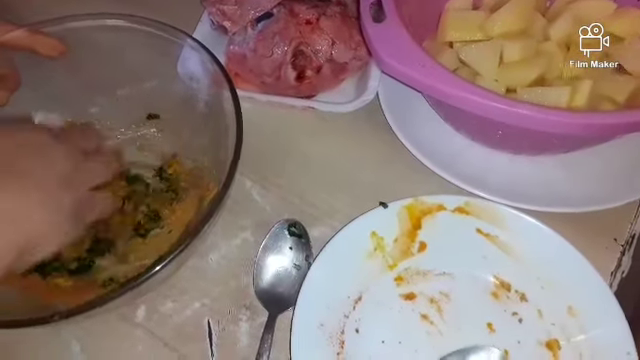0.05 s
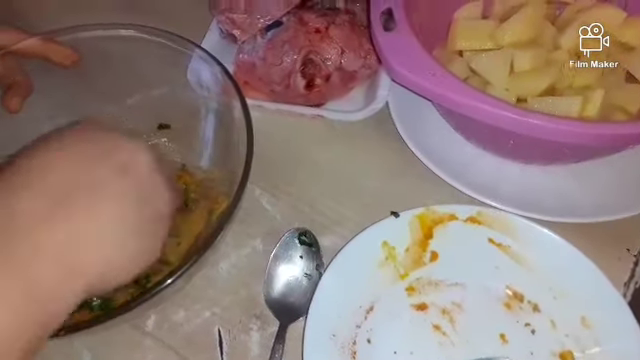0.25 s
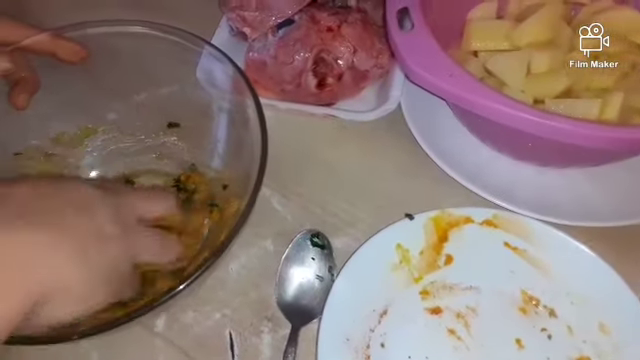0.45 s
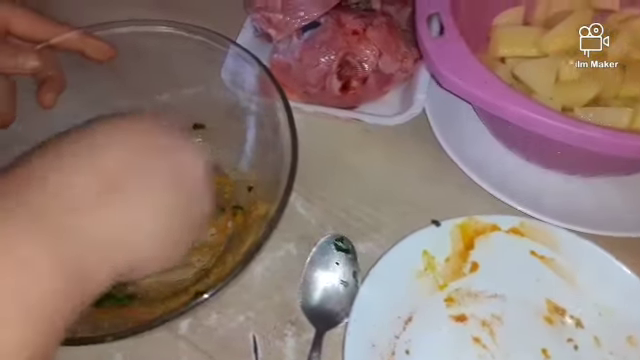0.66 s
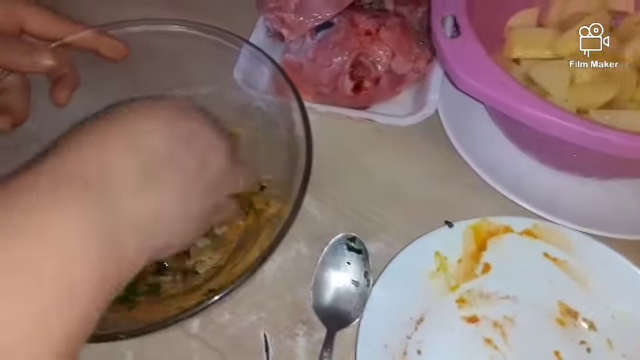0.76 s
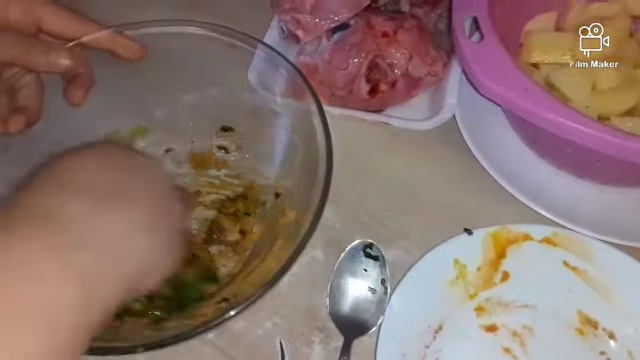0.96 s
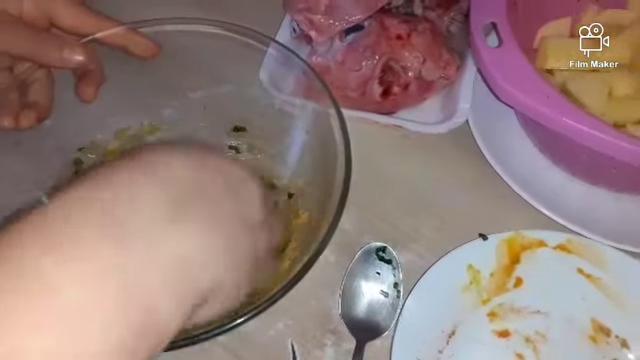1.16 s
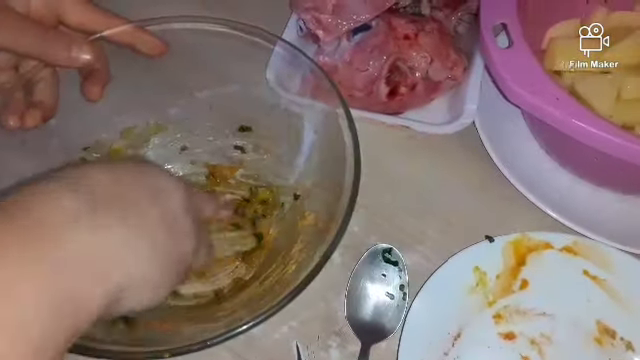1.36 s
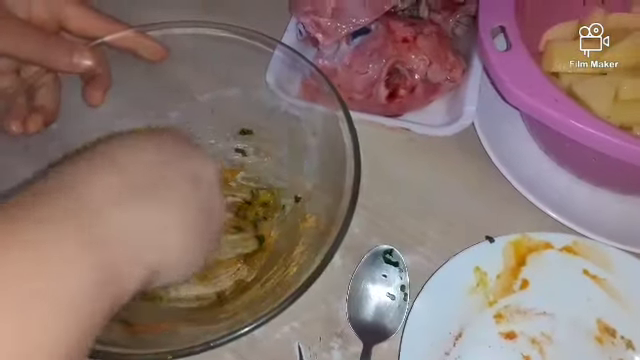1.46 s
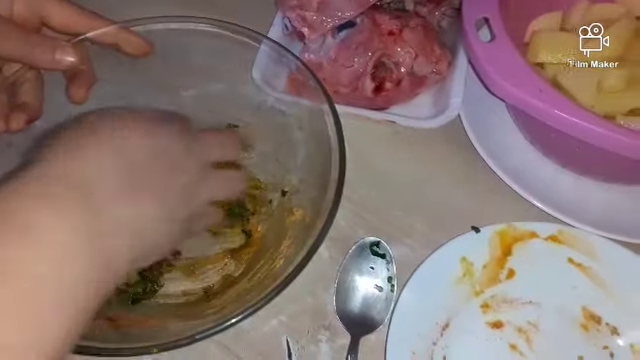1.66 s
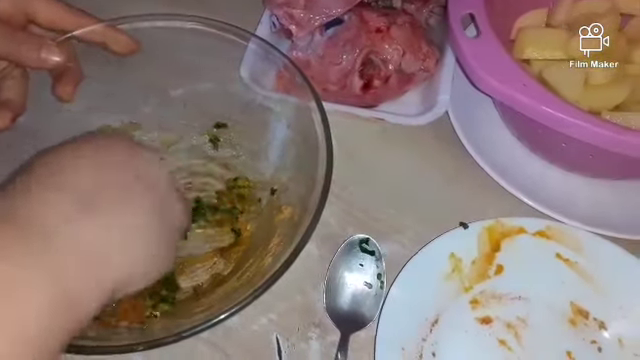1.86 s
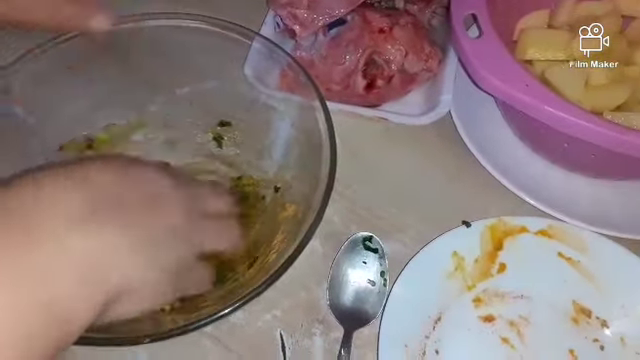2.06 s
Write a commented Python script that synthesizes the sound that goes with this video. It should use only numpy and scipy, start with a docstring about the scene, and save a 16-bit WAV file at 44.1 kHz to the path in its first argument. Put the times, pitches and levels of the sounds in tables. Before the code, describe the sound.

Hand mixing of sticky paste in a glass bowl: faint tableware ringing fades first, dull table thuds come throughout, strongest early and midway, then small wet pops gather toward the end; close, small reverberant kitchen.

```python
"""A kitchen table in a small room: two microphones hear a hand stir a wet paste in a glass bowl.
At first brushed tableware rings faintly and dies away; each hard stroke rocks the bowl, which thuds on the
table (filtered pushes), hardest near 0.2 s and 1.0 s. Paste crackles throughout (ringing clicks over noise);
from 0.27 s to the end air pockets pop (decaying sines) and the paste smacks off the glass (runs of clicks).
Behind it all lie the reverberation of bowl and room, hiss (coloured noise) and an appliance drone (a sine)."""
import sys
import numpy as np
from scipy import signal
from scipy.fft import rfft, irfft
from scipy.io import wavfile

SR = 44100
rng = np.random.default_rng(int(sys.argv[2]) if len(sys.argv) > 2 else 0)


def dump_mix(stems):
    """Bounce the given channels to the path in sys.argv[1] as a 16-bit WAV at rate SR."""
    frames = np.atleast_2d(stems).T  # one column per channel
    limited = np.clip(frames, -1, 1)  # hard clip at full scale
    pcm = np.round(limited * 32767).astype(np.int16)
    wavfile.write(sys.argv[1], SR, pcm)


N = 92610  # samples, 2.1 s

# The bowl bumps the table: (time [s], relative level [dB], softness: five times the push's rise time [s])
BOWL_KNOCKS = [(.005, -25, 0.0047), (0.1305, -12.5, 0.0039), (0.1998, -1.1, 0.0012), (0.4221, -21, 0.0029),
               (0.4529, -13, 0.0052), (.545, -29.5, 0.0037), (0.767, -12.5, .0044), (0.9507, -19, 0.0059),
               (1.014, -2.65, 0.0011), (1.24, -18.5, .0057), (1.327, -8, 0.0014), (1.702, -22, 0.0068),
               (1.899, -15.5, 0.0054)]
# Table top with the bowl on it:
# (frequency [Hz], level [dB], T60 [s], build-up time constant [s], lag at the right microphone [rad])
TABLE_TOP_MODES = [(100.7, -30, .57, .0016, 0), (116.9, -22.5, .236, .0035, 0),
                   (177, -35.5, .32, .0086, .3), (216.3, -30, .265, .0003, .18),
                   (257.3, -26.4, .089, .0024, 0), (306, -18.3, .3, .018, .1), (353, -28.6, .28, .0077, .6),
                   (396.2, -32.5, .2, .0017, 1), (432, -27.5, .146, .0022, .6),
                   (497.5, -34.5, .123, .0019, .9), (557, -33, .28, .003, .63), (785, -29, .12, .001, 1.5),
                   (1170, -33, .13, .0005, 1)]
# The slap returns from near surfaces: (delay [s], level [dB], lag at the right microphone [s])
SLAP_ECHOES = [(.01006, -3.2, .0006), (.01476, -4.4, 0), (.03324, -7, 0), (.06005, -4.5, .00018)]
# How hard the fingers work the paste: (time [s], relative level [dB])
STIRRING_EFFORT = [(0, -52), (.12, -54), (0.288, -53.5), (0.358, -63), (0.428, -60), (0.502, -59),
                   (.6, -55), (0.688, -52.5), (0.753, -67.5), (0.797, -74), (0.831, -56.5), (.9, -61.5),
                   (0.963, -51.5), (1.078, -56.5), (1.15, -54), (1.298, -65.5), (1.325, -53.5), (1.40, -53),
                   (1.46, -49), (1.549, -54), (1.62, -70.5), (1.72, -61), (1.79, -57.5), (1.828, -53),
                   (1.89, -53), (1.94, -50), (2.0, -62), (2.1, -60)]
# Tone colour of the paste: (frequency [Hz], relative level [dB])
PASTE_SPECTRUM = [(300, -3.5), (600, -5.5), (780, -4), (950, -0.5), (1250, 3), (1900, -6.5), (2700, -0.5),
                  (4300, -3.5), (6700, -3), (8200, -8.5), (9900, -21.5), (12500, -10.5), (15800, -20)]
# Air pockets burst: (time [s], relative level [dB], frequency [Hz], length of ring to -60 dB [cycles])
POCKET_BURSTS = [(.2665, -30, 5400, 12), (0.596, -31, 4450, 7.4), (0.689, -31.5, 7300, 1.3),
                 (0.8324, -42, 6170, 7), (0.945, -31, 4430, 4), (0.953, -28.5, 3900, 11),
                 (1.136, -27, 6660, 0.98), (1.1624, -45, 5590, 9.9), (1.311, -35, 5700, 15),
                 (1.4511, -27.5, 6100, 9.6), (1.5194, -26, 5990, 42), (1.5393, -26.5, 5940, 7.1),
                 (1.6154, -37, 6550, 6.6), (1.667, -33.5, 7060, 15), (1.673, -33, 4310, 10.4),
                 (1.819, -29.5, 4300, 12), (1.8713, -25, 2620, 20), (1.8715, -31.5, 4140, 34),
                 (1.9263, -27, 5800, 9.2), (1.9486, -26.5, 2910, 31), (1.9531, -39, 3080, 19)]
# The paste pulls off the glass: (time [s], level before the decay [dB], decay time constant [s], cavity [Hz])
PASTE_SMACKS = [(0.267, -47.5, 0.018, 3460), (0.278, -40, 0.013, 1160), (0.654, -58.5, 0.032, 855),
                (1.436, -56, 0.016, 1360), (1.515, -36, 0.0063, 830), (1.522, -45.5, .02, 1800),
                (1.871, -47.5, 0.017, 790), (1.925, -46, 0.029, 674), (1.926, -40, 0.0069, 3520),
                (1.943, -44, 0.0062, 1244), (1.947, -43, 0.009, 2920)]
# Partials of the ringing tableware: (frequency [Hz], relative level [dB])
TABLEWARE_PARTIALS = [(1954, -56), (2191, -52), (2290, -57), (2620, -59), (3338, -55), (4064, -80),
                      (4867, -61), (5227, -57.5), (6697, -60), (6950, -54), (7704, -57.5)]
# The tableware is brushed: (time [s], added level [dB])
TABLEWARE_TOUCHES = [(-.01, 2), (0.073, 2.5)]
# Stereo tilt of the wet sounds and tableware, before the two shares set in scene():
# (frequency [Hz], left over right [dB])
STEREO_TILT = [(500, -3), (1300, -1.5), (2400, 1), (4400, -7.5), (8000, -3.5), (12000, 1)]
# Tone colour of the room hiss: (frequency [Hz], relative level [dB])
HISS_SPECTRUM = [(25, -48), (60, -6), (150, 2.5), (250, -6), (340, 1.5), (600, -44), (800, -23.5),
                 (1220, -5.5), (1900, -30.5), (4000, -20.5), (7000, -20.5), (10000, -33), (13000, -23)]
# A kitchen appliance drones: (frequency [Hz], level [dB])
APPLIANCE_HUM = [(97, -58)]

# Bowl on the table
KNOCK_DB, SLAP_DB, SLAP_HZ, SLAP_T60_S = 5.5, -14.5, 329.5, 0.021
BOOM_DB, BOOM_HZ, BOOM_PEAK_S, BOOM_LENGTH_S = -26, 101.5, 0.02982, 0.014
GRATE_DB, GRATE_HZ, GRATE_T60_S = -40.5, 1270, 0.6
GRATE_GROWTH = 1.56  # dB of grating per dB of blow
KNOCK_ROOM_DB, KNOCK_WIDTH_DB, WIDTH_ABOVE_HZ = -10, -12.5, 330

# Paste
CRACKLE_DB, SMEAR_DB, CRACKLES_PER_S = -1.5, 0, 900
GRAIN_SPREAD_DB = 2.5  # scales the uneven sizes of crackle and smack clicks
STICK_SLIP_DB, STICK_SLIP_HZ = 0.8, 71  # RMS depth and low-pass corner of the uneven rubbing
POP_DB, SNAP_DB = -1, -27
SMACK_CYCLES, SMACK_GRAINS_PER_S = 6.5, 2400

# Tableware
RING_ATTACK_S, RING_T60_S = .006, 0.41
WAVER_HZ, WAVER_RAD, FLICKER_DB = 44.6, 1.2, 1.5  # low-pass corner; depths in phase and level

# Bowl, room and background
BOWL_ECHO_DB, BOWL_ECHO_T60_S = 2.5, 0.048
PASTE_ROOM_DB, RIGHT_LAG_S = -3, 0.00019
ROOM_T60_S, ROOM_TREBLE_T60_S, ROOM_SPLIT_HZ, ROOM_GAP_S = 0.42, 0.23, 920, 0.00074
HISS_DB, HISS_WIDE_HZ = -57, 645
CUTOFF_HZ = 15900


def from_db(db):
    """Decibels to gain."""
    return 10 ** (np.asarray(db) / 20)


def rms_one(x):
    """Scale to unit power."""
    return x / np.sqrt(np.mean(x ** 2) + 1e-20)


def seconds():
    """The time axis."""
    return np.arange(N) / SR


def cut(x, hz, kind, order=2):
    """Low- or high-pass."""
    sos = signal.butter(order, min(hz, .45 * SR), kind, fs=SR, output="sos")
    return signal.sosfilt(sos, x)


def colour(x, points, share=1):
    """Shape a spectrum by a share of a (frequency [Hz], level [dB]) table."""
    hz, db = np.transpose(points)
    f = np.maximum(np.fft.rfftfreq(N, 1 / SR), 1)
    shape_db = np.interp(np.log(f), np.log(hz), db)
    return irfft(rfft(x) * from_db(share * shape_db), N)


def ring(x, hz, t60):
    """A two-pole resonance: a unit click starts a decaying sine of height 1."""
    radius = from_db(-60 / (t60 * SR))
    w = 2 * np.pi * hz / SR
    return signal.lfilter([0, np.sin(w)], [1, -2 * radius * np.cos(w), radius * radius], x + 1e-18)


def fade(t, t60):
    """Exponential decay, held at 1 before time zero."""
    return np.exp(-np.log(1000) * np.maximum(t, 0) / t60)


def delay(x, s):
    """The same sound, later."""
    return np.interp(seconds() - s, seconds(), x, left=0)


def click(s):
    """A unit click."""
    return 1. * (np.arange(N) == int(s * SR))


def grains(per_s):
    """Random clicks of uneven size and either sign."""
    happens = rng.random(N) < per_s / SR
    sign = rng.choice([-1, 1], N)
    size = from_db(GRAIN_SPREAD_DB * np.minimum(rng.exponential(1, N), 4))
    return happens * sign * size


def room(x, t60, treble_t60):
    """Diffuse reverberation at each microphone: decaying noise; the treble has its own decay."""
    t = seconds()
    low_noise, high_noise = rng.standard_normal((2, 2, N))
    bass = cut(low_noise, ROOM_SPLIT_HZ, "low") * fade(t, t60) / np.sqrt(t60)
    treble = cut(high_noise, ROOM_SPLIT_HZ, "high") * fade(t, treble_t60) / np.sqrt(treble_t60)
    tail = rms_one((bass + treble) * (t > ROOM_GAP_S)) / np.sqrt(N)  # unit energy
    return signal.fftconvolve(x[None], tail, axes=1)[:, :N]


def table_response():
    """What one push sets off in the table: a slap with its echoes, a heave just after, ringing modes."""
    t = seconds()
    slap = from_db(SLAP_DB) * ring(click(0), SLAP_HZ, SLAP_T60_S)
    since_peak = t - BOOM_PEAK_S
    heave = np.cos(2 * np.pi * BOOM_HZ * since_peak) * np.exp(-(since_peak / BOOM_LENGTH_S) ** 2)
    body = slap + from_db(BOOM_DB) * heave
    for s, db, lag in SLAP_ECHOES:
        echo = np.array([delay(slap, s - lag / 2), delay(slap, s + lag / 2)])
        body = body + from_db(db) * echo
    for k, (hz, db, t60, build, lag) in enumerate(TABLE_TOP_MODES):
        tone = np.sin(2 * np.pi * hz * t + lag * np.array([[.5], [-.5]]))
        envelope = fade(t, t60) * (1 - np.exp(-t / build))
        body = body + (-1) ** k * from_db(db) * tone * envelope  # signs alternate
    return body


def knocks():
    """Soft pushes make the table top slap, heave and ring; the glass foot grates a little."""
    t = seconds()
    pushes = grating = 0
    for s, db, soft in BOWL_KNOCKS:
        age = np.maximum(t - s, 0) / soft
        push = age * np.exp(-5 * age)
        pushes = pushes - from_db(db + KNOCK_DB) * push / push.sum()
        grating = grating + from_db(GRATE_GROWTH * db + GRATE_DB) * (t > s) * fade(t - s, GRATE_T60_S)
    thud = signal.fftconvolve(pushes[None], table_response(), axes=1)[:, :N]
    thud = cut(thud, hz=66, kind="high", order=4)
    mid, side = room(thud.mean(0), ROOM_T60_S, ROOM_TREBLE_T60_S)
    side = from_db(KNOCK_WIDTH_DB) * cut(side, WIDTH_ABOVE_HZ, "high")
    grit = grating * rms_one(ring(rng.standard_normal((2, N)), GRATE_HZ, t60=0.00063))
    both = thud + grit + from_db(KNOCK_ROOM_DB) * mid + np.array([side, -side])
    return both * from_db([[-.6], [.6]])  # slightly louder on the right


def stirring():
    """Tiny wet films snap under the fingers, over a smooth, wide smear; the fingers stick and slip unevenly."""
    slip = rms_one(cut(rng.standard_normal(N), STICK_SLIP_HZ, "low"))
    effort_db = np.interp(seconds(), *np.transpose(STIRRING_EFFORT))
    effort = from_db(effort_db + STICK_SLIP_DB * slip)
    snaps = grains(CRACKLES_PER_S)
    dealt = rng.integers(0, 20, N)  # each snap rings one of 20 pitches
    crackle = 0
    for k, hz in enumerate(np.geomspace(550, 15000, 20)):
        crackle = crackle + ring(snaps * (dealt == k), hz, 6 / hz) * hz
    crackle = rms_one(colour(crackle, PASTE_SPECTRUM))
    smear = rms_one(colour(rng.standard_normal((2, N)), PASTE_SPECTRUM))
    return effort * from_db(CRACKLE_DB) * crackle, effort * from_db(SMEAR_DB) * smear


def pops():
    """Each bursting pocket snaps and rings as a decaying sine."""
    out = 0
    for s, db, hz, cycles in POCKET_BURSTS:
        burst = from_db(db + POP_DB) * click(s)
        snap = from_db(SNAP_DB) * ring(burst, hz=1470, t60=0.0006)
        out = out + ring(burst, hz, cycles / hz) + snap
    return out


def smacks():
    """A dying run of snaps rings the cavity between hand and glass."""
    t, out = seconds(), 0
    for s, db, decay, hz in PASTE_SMACKS:
        run = rms_one(ring(grains(SMACK_GRAINS_PER_S), hz, SMACK_CYCLES / hz))
        out = out + from_db(db) * run * (t > s) * np.exp(-np.abs(t - s) / decay)
    return cut(out, hz=400, kind="high")


def tableware():
    """High partials waver in phase and flicker in level, alike at both microphones, from separate phases."""
    t, out = seconds(), 0
    for s, touch_db in TABLEWARE_TOUCHES:
        attack = 1 - np.exp(-np.maximum(t - s, 0) / RING_ATTACK_S)
        swell = from_db(touch_db) * attack * fade(t - s, RING_T60_S)
        for hz, db in TABLEWARE_PARTIALS:
            waver, flicker = rms_one(cut(rng.standard_normal((2, N)), WAVER_HZ, "low"))
            start = rng.random((2, 1))  # one starting phase for each microphone
            phase = 2 * np.pi * (hz * t + start) + WAVER_RAD * waver
            level = np.sqrt(2) * from_db(db + FLICKER_DB * flicker)
            out = out + level * swell * np.sin(phase)
    return out


def background():
    """A low appliance drone, and room hiss that is alike at both microphones in the bass."""
    mid, side = cut(colour(rng.standard_normal((2, N)), HISS_SPECTRUM), hz=65.6, kind="high", order=3)
    side = cut(side, HISS_WIDE_HZ, "high", order=1)
    hiss = from_db(HISS_DB) * rms_one(np.array([mid + side, mid - side]))
    hum = 0
    for hz, db in APPLIANCE_HUM:
        hum = hum + from_db(db) * np.sin(2 * np.pi * (hz * seconds() + rng.random()))
    return hiss + hum


def scene():
    """Wet sounds echo in the bowl and the kitchen; thuds come through the table."""
    crackle, smear = stirring()
    paste = crackle + pops() + smacks()
    bowl = from_db(BOWL_ECHO_DB) * room(paste, BOWL_ECHO_T60_S, BOWL_ECHO_T60_S)
    kitchen = from_db(PASTE_ROOM_DB) * room(paste, ROOM_T60_S, ROOM_TREBLE_T60_S)
    direct = np.array([paste, delay(paste, RIGHT_LAG_S)])  # reaches the right microphone later
    left, right = direct + bowl + kitchen + smear + tableware()
    tilted = np.array([colour(left, STEREO_TILT, share=0.65), colour(right, STEREO_TILT, share=-0.46)])
    return tilted + knocks() + background()


def record(dry):
    """A steep elliptic low-pass removes the top of the treble."""
    return signal.sosfilt(signal.ellip(12, .1, 80, CUTOFF_HZ, fs=SR, output="sos"), dry)


dry = scene()
out = record(dry)
dump_mix(out)
```